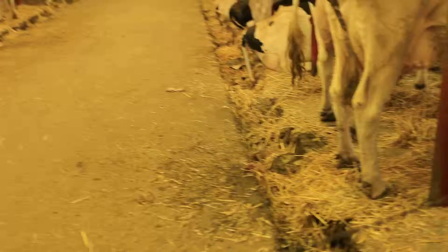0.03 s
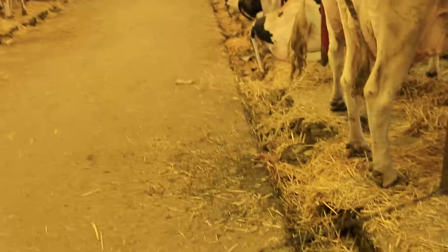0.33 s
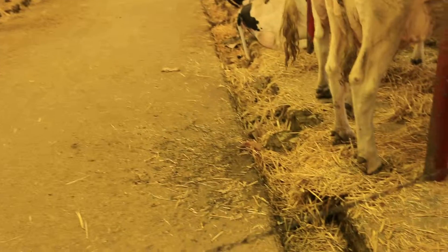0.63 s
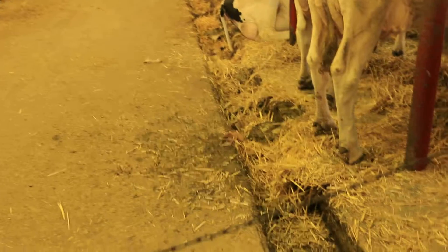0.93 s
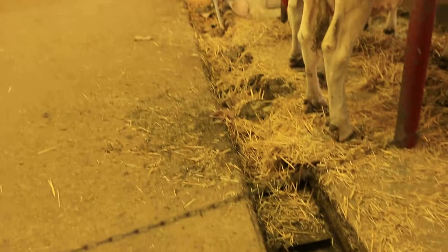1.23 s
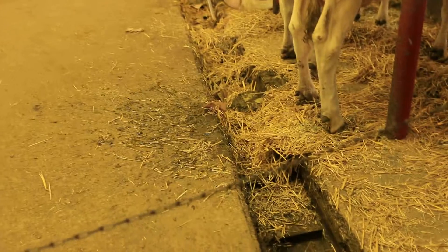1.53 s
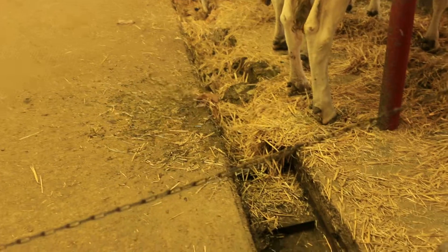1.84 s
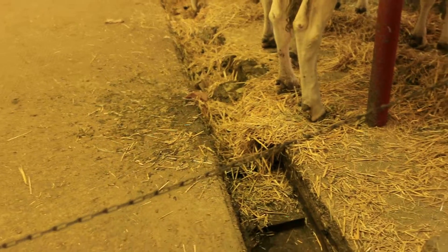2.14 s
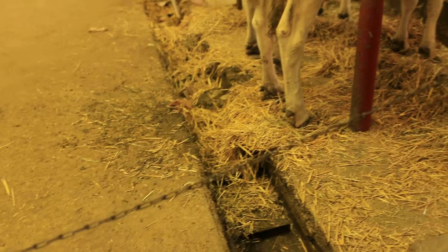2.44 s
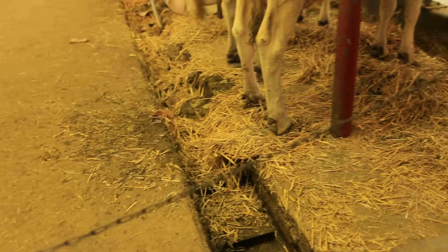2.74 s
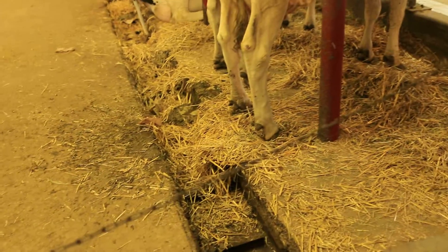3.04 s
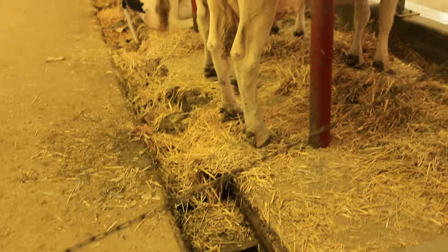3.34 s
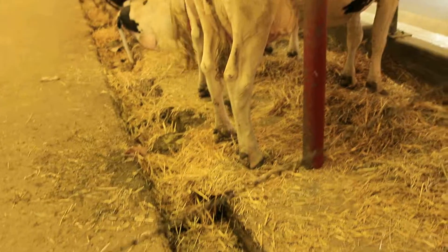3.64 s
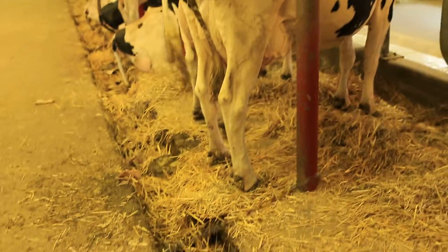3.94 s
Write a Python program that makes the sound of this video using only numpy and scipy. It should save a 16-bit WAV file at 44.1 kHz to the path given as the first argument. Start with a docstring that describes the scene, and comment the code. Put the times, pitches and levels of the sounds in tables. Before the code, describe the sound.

Barn machinery running steadily, with a deep rush of fans and a wavering pump whine.

```python
"""Cattle barn, machinery running steadily.
Fans push a deep rush of air through ringing ducts, and hum.
A rotary pump, probably for milking, whines on multiples of its shaft rate.
Sound arrives by many reflections: each tone swells and fades, the treble is wide."""
import sys
import numpy as np
from scipy import signal
from scipy.fft import rfft, irfft
from scipy.io import wavfile
from scipy.ndimage import uniform_filter1d

SR = 44100
rng = np.random.default_rng(int(sys.argv[2]) if len(sys.argv) > 2 else 0)


def wrap_up_sound(samples):
    """Save the sound to the file named by the first command line argument, as 16-bit audio."""
    columns = np.atleast_2d(samples).T
    # keep every value between -1 and 1, then stretch to whole-number steps
    tamed = np.clip(columns, -1, 1)
    steps = np.round(tamed * 32767).astype(np.int16)
    wavfile.write(sys.argv[1], SR, steps)


N = 176400

# Air rush, base spectrum: (frequency [Hz], mid [dB/Hz], side [dB/Hz])
RUSH_SPECTRUM = [(20, -75, -90.0), (44, -64, -82.8), (53.4, -52.5, -81.1), (93, -59, -98),
                 (112.7, -45.5, -87), (170, -49, -71), (260, -51.5, -73), (303, -49, -71), (370, -52, -69),
                 (570, -50, -68), (820, -54.5, -65.5), (1120, -56.5, -65), (1500, -57.5, -62),
                 (1700, -61.5, -68.5), (2080, -61, -66.5), (2660, -67.5, -69), (3230, -68, -71),
                 (4480, -72, -72.5), (4850, -73.9, -74), (5500, -76.5, -72), (6150, -78.5, -78.5),
                 (8300, -81, -76.5), (10270, -81.5, -79.5), (10800, -88, -85), (12400, -87, -85.5),
                 (14000, -92.8, -92.9), (15600, -95, -98.8)]
# Duct and housing resonances: (frequency [Hz], half-width [Hz], base mid [dB], base side [dB])
DUCT_MODES = [(164, 23, -40, -60), (312.5, 28, -36.5, -58), (1184, 10, -38, -50), (1210, 17, -32, -43),
              (1278, 14, -33.5, -45), (1335, 17, -36, -46), (1379, 35, -30.5, -43), (1434, 31, -37, -46),
              (1576, 29, -41.5, -54), (3250, 150, -51, -56), (5175, 160, -47.5, -48), (5780, 150, -51, -49),
              (6800, 220, -57, -47), (8480, 110, -54.5, -55)]
# Faint whistles: (frequency [Hz], half-width [Hz], base mid [dB], base side [dB])
WHISTLE_MODES = [(4710, 10, -57, -56), (6960, 14, -57, -62), (7760, 11, -57.5, -55), (10450, 50, -63, -62),
                 (13480, 50, -72, -72)]
# Air balance: (frequency [Hz], left minus right [dB])
AIR_LEAN = [(250, 0.06), (600, -0.5), (2200, -0.8), (4500, 0), (8000, 2.5), (15000, 1.7)]
# Air bands below ROAR_LO_HZ: (time [s], gain [dB])
BASS_TREND = [(0, 1), (1.3, -1), (2.2, 1), (4, 3.5)]
# Air bands from ROAR_LO_HZ to ROAR_HI_HZ: (time [s], gain [dB])
ROAR_TREND = [(0, -0.8), (1, 0.3), (1.85, 1), (2.5, 0), (3.2, 0.1), (4, 0.3)]
# Air bands above ROAR_HI_HZ: (time [s], gain [dB])
HISS_TREND = [(0, -0.1), (.8, -0.3), (1.7, 0.7), (2.3, 0), (3.2, -0.2), (4, 0)]
# Pump tones: (order [x shaft rate], mid [dB], side [dB])
PUMP_HARMONICS = [(10, -31, -42.5), (12, -34, -47), (16, -46.5, -54), (18, -46.5, -57), (20, -39.5, -60),
                  (24, -44, -40.5), (28, -41, -55), (29, -46.5, -53), (35, -44, -52), (37, -44, -57),
                  (40, -47.5, -53), (41, -48.5, -56), (43, -49.5, -60), (49, -57.5, -58)]
# Strongest pump whine: (time [s], level [dB])
WHINE_ENVELOPE = [(.07, -28), (.27, -21), (.55, -25), (.9, -28.5), (1.4, -25), (1.7, -34.5), (2.4, -28.5),
                  (3.05, -33.5), (3.3, -24.5), (3.58, -34.5), (3.79, -19), (3.88, -36)]
# Fan and motor tones: (frequency [Hz], level before FAN_GAIN_DB [dB])
FAN_TONES = [(37.5, -52), (58.5, -41.5), (119, -40), (143, -41), (169.5, -41.5), (239.5, -40.5),
             (339, -38.5), (555.5, -36), (786, -40.5), (1205, -33.5)]

ROAR_LO_HZ, ROAR_HI_HZ = 100, 700
SWELL_DB, SWELL_PER_S, FLICKER_DB, FLICKER_PER_S = .23, 1.28, .5, 8.93
ECHO_SHARE, ECHO_MAX_S, ECHO_ABOVE_HZ = .36, .012, 1960
SHAFT_HZ, SPEED_DRIFT, DRIFT_PER_S = 51.14, .0004, .99
PUMP_FADE, PUMP_FADE_PER_S = .43, 2.92
WHINE_ORDER, WHINE_SIDE_DB, WHINE_FADE = 27, -23, .097
FAN_GAIN_DB, FAN_SIDE_DB, FAN_FADE, FAN_FADE_PER_S = 1.5, -30.5, .28, 3.57
START_S, LOWPASS_HZ = .0726, 15720


def air(t):
    """Turbulent rush and the resonances it rings; octave bands swell together, flicker alone."""
    hz = np.arange(N // 2 + 1) * SR / N
    points_hz, mid_db, side_db = np.array(RUSH_SPECTRUM).T
    mid, side = (noise(colour(hz, points_hz, db)) * reflections(hz) for db in (mid_db, side_db))
    for mode_hz, width_hz, ring_mid_db, ring_side_db in DUCT_MODES + WHISTLE_MODES:
        ring = np.sqrt(2 / (np.pi * width_hz)) / (1 + ((hz - mode_hz) / width_hz) ** 2)
        mid += noise(ring * undb(ring_mid_db))
        side += noise(ring * undb(ring_side_db))
    lean = np.sqrt(colour(hz, *np.array(AIR_LEAN).T))
    spectrum = stereo(mid, side) * np.array([lean, 1 / lean])
    octave = np.log2(np.clip(hz, 64, 16384))
    bass_db, roar_db, hiss_db = (np.interp(t, *np.array(trend).T)
                                 for trend in (BASS_TREND, ROAR_TREND, HISS_TREND))
    swell_db = SWELL_DB * walk(SWELL_PER_S)
    out = 0
    for k in range(6, 15):
        band = irfft(spectrum * np.maximum(1 - abs(octave - k), 0), N)
        trend_db = bass_db if 2 ** k < ROAR_LO_HZ else roar_db if 2 ** k < ROAR_HI_HZ else hiss_db
        out += band * undb(swell_db + trend_db + FLICKER_DB * walk(FLICKER_PER_S))
    return out


def pump(t):
    """Harmonics of one drifting shaft; one stands out as a swelling whine."""
    turns = np.cumsum(SHAFT_HZ * (1 + SPEED_DRIFT * walk(DRIFT_PER_S))) / SR
    harmonics = 0
    for order, mid_db, side_db in PUMP_HARMONICS:
        mid, side = (tone(order * turns, PUMP_FADE, PUMP_FADE_PER_S) for _ in range(2))
        harmonics += stereo(mid * undb(mid_db), side * undb(side_db))
    mid, side = (tone(WHINE_ORDER * turns, WHINE_FADE, PUMP_FADE_PER_S) for _ in range(2))
    whine_db = np.interp(t, *np.array(WHINE_ENVELOPE).T)
    return harmonics + stereo(mid, side * undb(WHINE_SIDE_DB)) * undb(whine_db)


def fans(t):
    """Blade and motor tones, wavering in the room."""
    out = 0
    for hz, db in FAN_TONES:
        mid, side = (tone(hz * t, FAN_FADE, FAN_FADE_PER_S) for _ in range(2))
        out += undb(db + FAN_GAIN_DB) * stereo(mid, side * undb(FAN_SIDE_DB))
    return out


def reflections(hz, count=14):
    """Comb response: direct hiss plus short echoes off nearby surfaces."""
    lags, coins = rng.random((count, 2)).T
    echoes = sum(np.sign(coin - .5) * np.exp(-2j * np.pi * hz * delay_s)
                 for delay_s, coin in zip(lags * ECHO_MAX_S, coins)) / np.sqrt(count)
    share = ECHO_SHARE * np.clip(hz / ECHO_ABOVE_HZ - 1, 0, 1)
    return (1 + share * echoes) / np.sqrt(1 + share ** 2)


def tone(turns, fade, rate_per_s):
    """Sine plus reflections that slowly shift level and phase; rms near 1."""
    paths = (1 + fade * (walk(rate_per_s) + 1j * walk(rate_per_s))) / np.sqrt(1 + 2 * fade ** 2)
    return np.sqrt(2) * np.real(paths * np.exp(2j * np.pi * (turns + rng.random())))


def walk(rate_per_s):
    """Random steps, smoothed twice; spread near 1."""
    hold = int(SR / rate_per_s)
    steps = np.repeat(rng.standard_normal(N // hold + 3), hold)
    start = rng.integers(hold)
    return 1.32 * uniform_filter1d(uniform_filter1d(steps, hold), hold)[start:start + N]


def noise(gain_per_root_hz):
    """Noise spectrum of given amplitude density."""
    return rfft(rng.standard_normal(N)) * gain_per_root_hz * np.sqrt(SR / 2)


def colour(hz, points_hz, db):
    """Gain curve, interpolated over log frequency."""
    return undb(np.interp(np.log(hz + 1), np.log(np.sort(points_hz)), db))


def stereo(mid, side):
    """Mid/side to left/right."""
    return np.array([mid + side, mid - side])


def undb(db):
    """Decibels to gain."""
    return 10 ** (np.asarray(db) / 20)


def scene():
    """Air, pump and fans, summed."""
    t = np.arange(N) / SR
    return air(t) + pump(t) + fans(t)


def record(dry):
    """Silence until START_S; steep low-pass."""
    gate = np.arange(N) / SR >= START_S
    lowpass = signal.ellip(14, .1, 110, LOWPASS_HZ, fs=SR, output="sos")
    return signal.sosfilt(lowpass, dry * gate)


dry = scene()
out = record(dry)
wrap_up_sound(out)
```